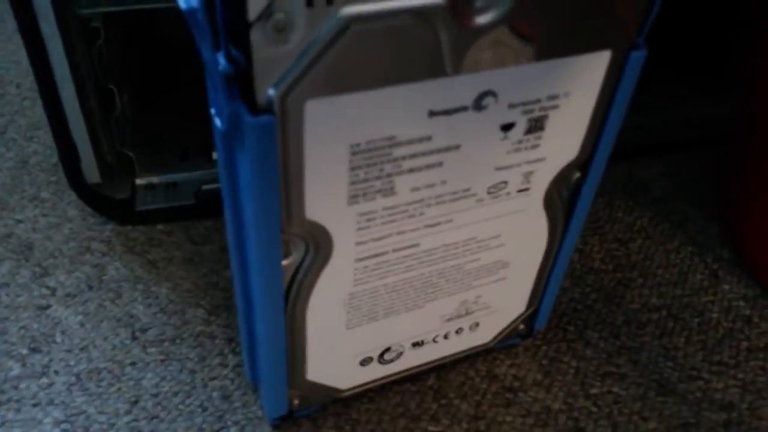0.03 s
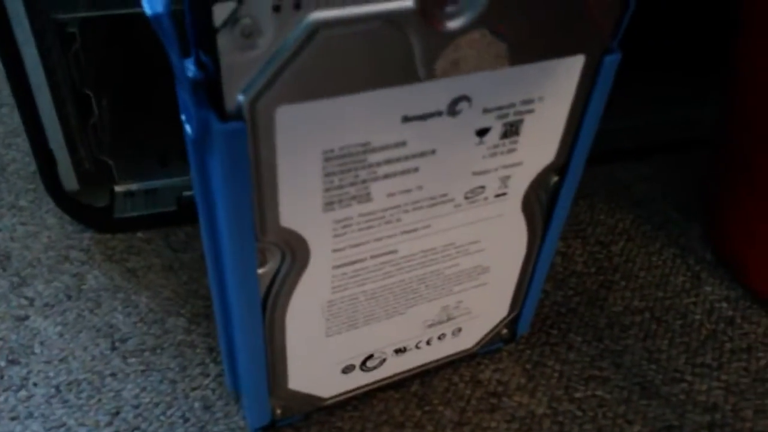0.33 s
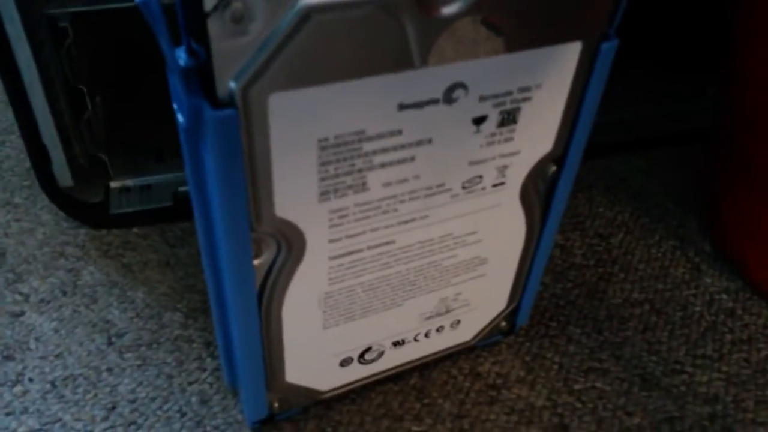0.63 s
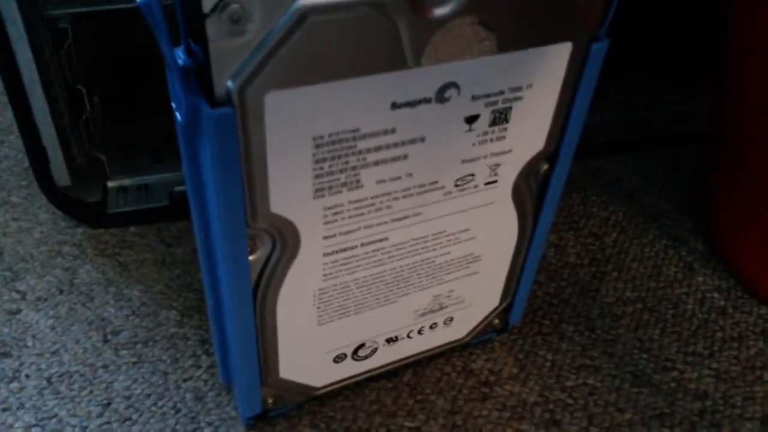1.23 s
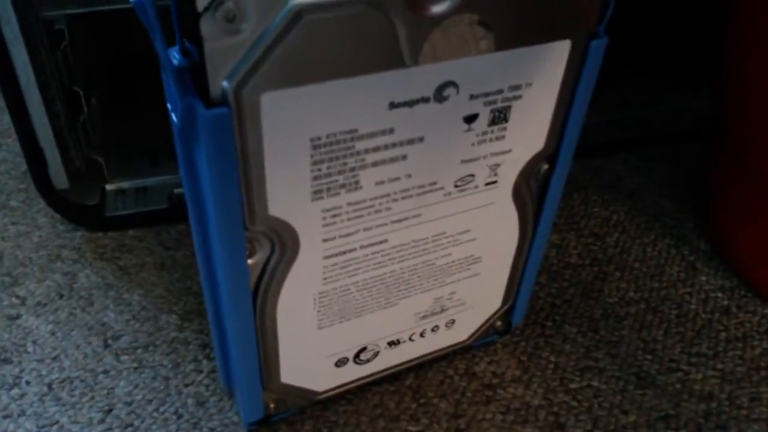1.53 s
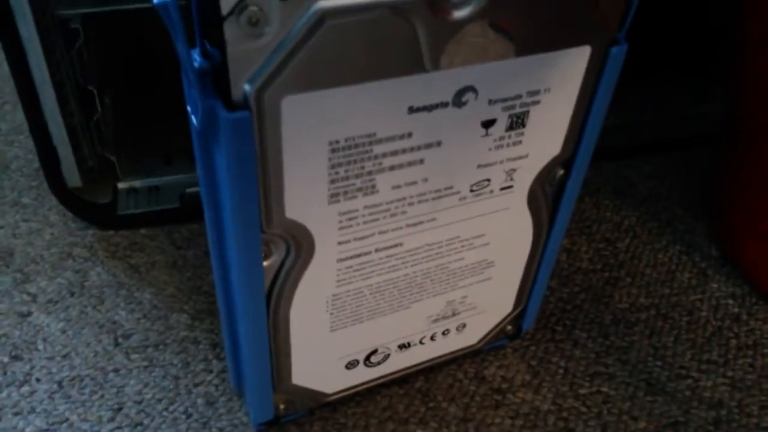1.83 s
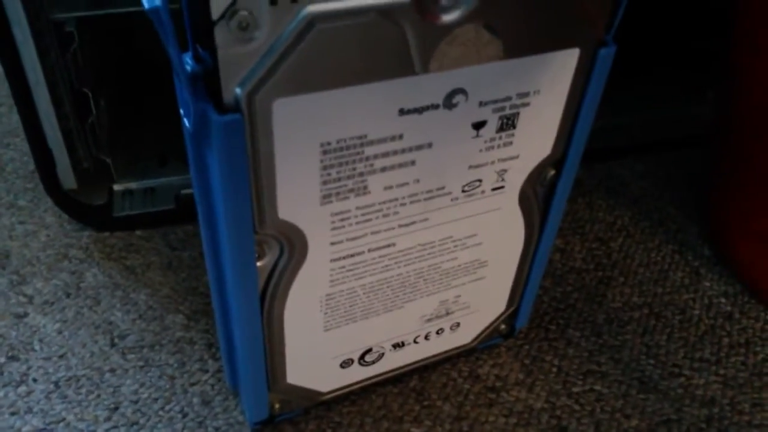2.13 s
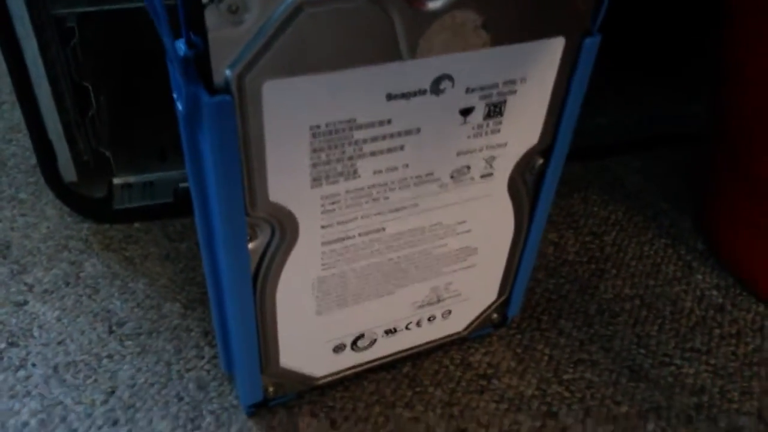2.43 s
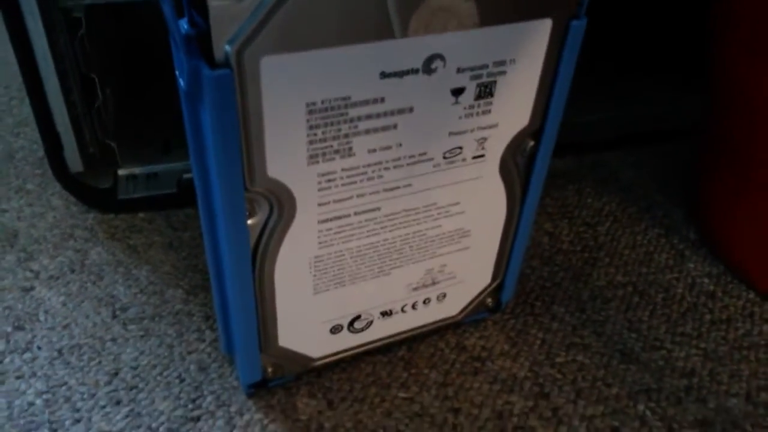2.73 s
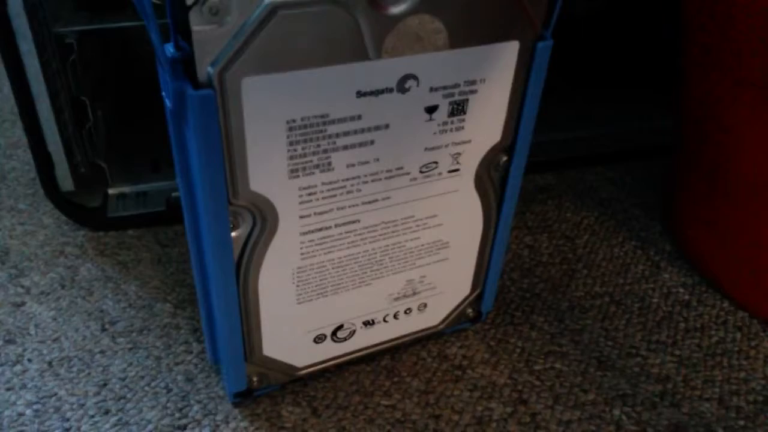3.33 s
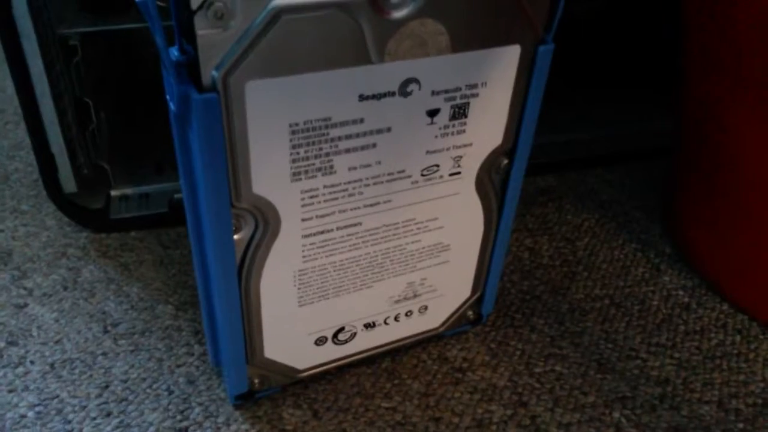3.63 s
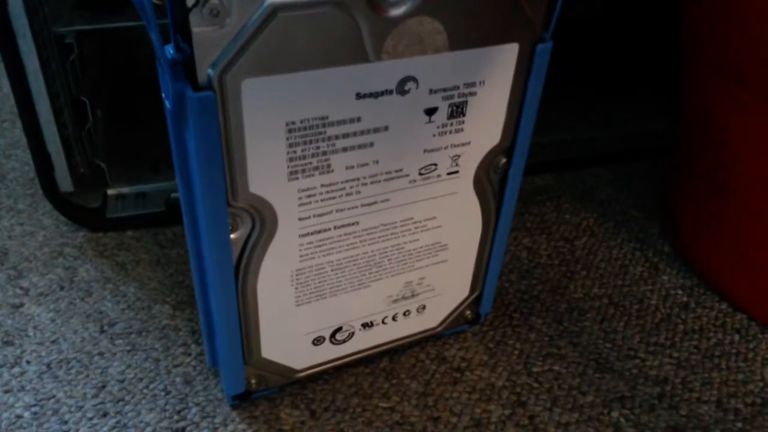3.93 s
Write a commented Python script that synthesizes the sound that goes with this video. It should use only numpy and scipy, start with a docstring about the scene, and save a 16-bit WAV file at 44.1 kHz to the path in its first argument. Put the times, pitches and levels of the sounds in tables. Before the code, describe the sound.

A hard drive spins up, its metallic hiss and whine rising in pitch.

```python
"""A bare hard drive spins up on a carpet, close by, in a quiet room with a low hum.
Two soft swishes come first. The spindle then rubs loosely, hissing through the ringing metal casing,
with a dull scrape, small knocks and, just after 1 s, brief squeaks. As speed builds, a rough whine enters
and the rub becomes a pattern that repeats every turn and climbs in pitch. Two more knocks come before 2 s;
near the end the whine sinks into the hiss."""
import sys
import numpy as np
from scipy import signal
from scipy.fft import rfft, irfft
from scipy.io import wavfile

SR = 44100
rng = np.random.default_rng(int(sys.argv[2]) if len(sys.argv) > 2 else 0)


def store_pcm(level_fs):
    """Save levels as 16-bit WAV."""
    pcm = np.round(np.clip(level_fs, -1, 1) * 32767).astype(np.int16)
    wavfile.write(sys.argv[1], SR, np.atleast_2d(pcm).T)


N = 176400
TOP_HZ = 14600


def spindle(turns, speed_rps):
    """Loose rub gives way to a per-turn pattern; both ring the casing, whose colour shifts with speed."""
    # Each row: time in seconds, level in dB.
    hiss_level = [(0, -77), (.35, -58.5), (.46, -48.5), (.68, -37), (1.2, -30.5), (1.7, -26.5), (2.2, -23),
                  (2.8, -22), (3.4, -22.5), (4, -22)]
    # Each row: resonance in Hz, width in Hz, left gain in dB, right gain in dB, low-speed change in dB.
    casing_modes = [(3068, 260, -24.5, -43, -11), (3592, 250, -17, -33, -12.5),
                    (3950, 160, -18.5, -27, -18.5), (4164, 109, 1, -12, -14), (4333, 106, 1.5, -13, -18),
                    (4666, 150, -3.5, -21, -15), (4850, 120, -2, -40, -22.5), (5044, 153, -4, -42, -14.5),
                    (5465, 165, -2.5, -25, -15.5), (5640, 220, -11, -21.5, -17),
                    (5832, 188, 0.5, -27.5, -13.5), (6224, 154, 4, -27, -21), (6430, 260, -18, -17, -11.0),
                    (6393, 240, -5.5, -40.0, -5.5), (6670, 137, -2, -9.5, -10),
                    (7026, 190, -1.5, -13.5, -4), (7186, 120, -9.5, -37.5, 3),
                    (7450, 183, -10.5, -18.5, -1.5), (7767, 223, -16, -28, -3.5),
                    (8040, 230, -7.5, -4.0, -20.5), (8310, 220, -6.5, -17.0, -11),
                    (8560, 130, -9.5, -32.5, -17), (8800, 450, -15.0, -15.5, -8.5),
                    (9180, 210, -15.0, -40, -7.5), (9520, 430, -14, -20.5, -19),
                    (10230, 630, -19, -18.0, -15), (10710, 440, -19.5, -43, -19.0),
                    (11370, 540, -19.5, -24.5, -8), (11970, 330, -18.5, -28.5, -10.5),
                    (12400, 490, -21, -22, -27)]
    # Floor under the resonances. Each row: frequency in Hz, gain in dB.
    casing_floor = [(300, -75), (1000, -136), (2000, -103), (3000, -80), (8000, -40), (12500, -30),
                    (13200, -37), (14500, -48)]
    # Broad rub at low speed. Each row: frequency in Hz, gain in dB.
    slow_rub = [(300, -72), (1500, -74), (2200, -69), (2900, -39), (3300, -61), (4200, -46), (5000, -33),
                (6500, -29), (9000, -40), (12000, -40), (14500, -51)]
    # Each row: frequency in Hz, phase lead of the left side in radians.
    left_lead = [(0, 0), (3190, 5), (3700, 1.6), (4050, -1.5), (5860, 1), (6720, -9), (8440, -5),
                 (8790, -5), (9130, -1.5), (9470, -4.5), (10800, -8.5), (11300, -8.5), (13300, -3.5),
                 (14000, -1.5)]
    # Each row: frequency in Hz, weight (0-1) of the right side's part unrelated to the left.
    stereo_spread = [(3000, 0.73), (4200, 0.66), (8000, 0.64), (12000, 0.8)]
    locked = 0.75 * ramp(speed_rps, 5.8, 30.5)  # share that repeats each turn
    left, unrelated = (np.sqrt(locked) * roughness(turns, speed_rps)
                       + np.sqrt(1 - locked) * rng.standard_normal(N) for _ in range(2))
    spread = across(stereo_spread)
    related = shaped(left, np.sqrt(1 - spread ** 2) * np.exp(-1j * across(left_lead)))
    drive = np.array([left, related + shaped(unrelated, spread)])
    hz, width_hz, left_db, right_db, change_db = np.array(casing_modes, float).T
    floor = undb(across(casing_floor))
    fast, slow = (np.array([np.hypot(resonances(zip(hz, width_hz, db + shift_db)), floor)
                            for db in (left_db, right_db)]) for shift_db in (0, change_db + 14))
    slow = np.hypot(slow, undb(across(slow_rub)))
    blend = ramp(speed_rps, 24, 40.1)
    hiss = blend * shaped(drive, unit(fast)) + (1 - blend) * shaped(drive, unit(slow))
    flutter_db = 0.5 * walk(rate_hz=160) - 0.1 * np.sin(2 * np.pi * turns)
    return hiss * undb(curve(hiss_level) + flutter_db)


def roughness(turns, speed_rps, size=16384, max_order=1500):
    """Roughness around the spindle, passed once a turn; its bands climb with speed."""
    # Each row: centre and width in multiples of the turn rate, boost in dB.
    strong_bands = [(64.5, 2, 10), (68.6, 2, 9), (77.9, 1.5, 8.5), (82.4, 3.5, 7.5), (87.7, 3, 4),
                    (92.6, 1.5, 8.5), (104.4, 2, 3), (111.6, 2, 7), (118.7, 7, 6.5), (126.5, 4, 7),
                    (140.95, 2, 8), (154.3, 4, 5.5), (177.3, 14, 3.5), (268, 30, 1.5)]
    order = np.arange(size // 2 + 1)
    boost_db = sum(db * np.exp(-(2 * (order - centre) / width) ** 2) for centre, width, db in strong_bands)
    phase = 2 * np.pi * rng.random(len(order))
    ripple = np.exp(1j * phase) * undb(boost_db + 2.1 * rng.standard_normal(len(order)))
    out, low = 0, 20
    while low < max_order:
        high = low + low // 3
        profile = irfft(ripple * ((order >= low) & (order < high)), size) * size
        fade = 1 - ramp(low * speed_rps, TOP_HZ, TOP_HZ + 1000)
        out = out + fade * np.interp(turns % 1 * size, np.arange(size), profile)
        low = high
    return out * np.sqrt(speed_rps / SR)


def whine(turns, speed_rps):
    """Rough partials, each a narrow noise band, climb and grow with speed, then sink into the hiss."""
    # Each row: multiple of the turn rate, relative level in dB at 40 turns/s, dB per doubling of speed.
    partials = [(57.3, -62, 20), (57.56, -58, 15), (59.6, -59, 4.5), (59.7, -64.5, 9), (81.7, -73, 20),
                (113, -71, 8), (114.8, -61.5, 6), (117.2, -57.5, 3), (120, -69, 3), (143, -69, 2),
                (161.5, -56, 8.5), (161.3, -61, 3)]
    # Each row: speed in turns per second, gain in dB.
    speed_fade = [(0, -2), (40, 0), (48, -0.5), (53, -8.5), (61, -17)]
    band_hz = 36
    doublings = np.log2(speed_rps / 40 + 1e-6)
    tone = 0
    for multiple, db, growth_db in partials:
        phase = 2 * np.pi * multiple * turns
        band = walk(band_hz) * np.sin(phase) + walk(band_hz) * np.cos(phase)
        tone = tone + undb(db + growth_db * doublings) * band
    fade_db = np.interp(speed_rps, *np.array(speed_fade, float).T)
    return tone * ramp(speed_rps, 9.6, 15) * undb(fade_db) * stereo_db(1.5, -1.5)


def knocks():
    """Small padded knocks: a hollow body note and a metallic tick, each with a short tail."""
    # Each row: start in seconds, relative body and tick levels in dB.
    hits = [(0.409, -47.5, -30.5), (0.609, -52, -30.5), (0.625, -42.5, -29), (1.726, -43, -27),
            (1.919, -39.5, -26)]
    # Each row of both: resonance in Hz, width in Hz, gain in dB.
    body_modes = [(410, 1200, -11), (1040, 350, -7), (1330, 180, 0), (1424, 70, 2), (2600, 620, -11.5)]
    tick_modes = [(4670, 370, -3), (5470, 1100, 6), (7060, 1600, -3)]
    rise_s, body_decay_s, tick_decay_s, tail_decay_s, tail_db = 0.0078, 0.011, 0.0057, 0.022, -24
    body = wide(resonances(body_modes), side=0.46)
    tick = wide(resonances(tick_modes), side=0.15) * stereo_db(4, -8)
    out = 0
    for start_s, body_db, tick_db in hits:
        age_s = np.maximum(times() - start_s, 0)
        rise = 1 - np.exp(-(age_s / rise_s) ** 2)
        tail = undb(tail_db) * np.exp(-age_s / tail_decay_s)
        for ring, db, decay_s in ((body, body_db, body_decay_s), (tick, tick_db, tick_decay_s)):
            out = out + 2 * ring * undb(db) * rise * (np.exp(-age_s / decay_s) + tail)
    return out


def squeaks():
    """As the motor picks up: a rising chirp, a tiny high squeak and a faint sagging tone, all unsteady."""
    # Each row: peak time in seconds, pitch there in Hz, glide in Hz/s, half length in seconds, relative dB.
    glides = [(1.19, 5860, 26000, 0.012, -27.5), (1.225, 13750, 12000, .012, -47),
              (1.255, 2280, -1100, 0.064, -57.5)]
    out = 0
    for peak_s, hz, hz_per_s, half_s, db in glides:
        age_s = times() - peak_s
        phase = 2 * np.pi * (hz * age_s + hz_per_s * age_s ** 2 / 2) + 0.5 * walk(rate_hz=60)
        out = out + np.sin(phase) * np.exp(-(age_s / half_s) ** 2) * undb(db)
    return out * stereo_db(4, -10)


def swishes():
    """Two soft, bright swishes before the spin-up, over a faint steady hiss."""
    # Each row: start, attack and length in seconds, relative level in dB.
    swells = [(0.077, 0.019, 0.072, -46), (0.21, 0.063, 0.094, -46)]
    # Each row: frequency in Hz, gain in dB.
    spectrum = [(1000, -39), (3000, -27), (4800, -3), (6200, -0.5), (7500, -7), (9000, -13.5),
                (14000, -20.5)]
    envelope = undb(-63.5)  # steady hiss
    for start_s, attack_s, length_s, db in swells:
        age_s = np.maximum(times() - start_s, 0)
        rise = 1 - np.exp(-(age_s / attack_s) ** 2)
        envelope = envelope + undb(db) * rise * np.exp(-(age_s / length_s) ** 2)
    return envelope * wide(undb(across(spectrum)), side=0.94) * stereo_db(1.5, -1.5)


def scrape():
    """Dull scraping while the spindle gathers speed; six bands flicker independently."""
    # Each row: frequency in Hz, gain in dB.
    spectrum = [(200, -13), (500, 4), (700, -0.5), (1000, -1.5), (1500, -8), (1900, -0.5), (2400, -9),
                (3000, -3.5), (3400, -9), (6000, -24)]
    # Each row: time in seconds, level in dB.
    level = [(0, -69), (.35, -61.5), (.7, -57), (1.05, -57), (1.3, -54), (1.6, -56), (2.0, -69.5),
             (2.5, -70), (3.2, -91), (4, -104)]
    flicker_db, spacing_oct = 3, 0.6
    colour, octave = undb(across(spectrum)), np.log2(bins() / 400)
    out = 0
    for k in range(6):
        band = colour * np.exp(-(octave - spacing_oct * k) ** 2 / 0.2)
        mid, side = (shaped(rng.standard_normal(N), band) for _ in range(2))
        out = out + (mid + 1.04 * np.array([side, -side])) * undb(flicker_db * walk(rate_hz=19))
    return unit(out) * undb(curve(level))


def room():
    """A wavering low hum, an uneven dull rustle and a faint steady rumble."""
    # Each row: resonance in Hz, width in Hz, gain in dB.
    hum_modes = [(80.6, 8.6, -2), (98.9, 10.5, 0.5), (121, 13, -7), (159, 60, -16), (187.3, 12.5, -10)]
    # Each row of both: time in seconds, level in dB.
    hum_level = [(0, -57.5), (.35, -54), (.75, -46), (1.1, -51.5), (1.35, -46.5), (1.8, -48.5), (2.1, -46),
                 (2.9, -46), (3.4, -45), (4, -47)]
    rustle_level = [(0, -74), (.35, -64), (.7, -58), (1.7, -53), (2.3, -57), (3, -60.5), (4, -66.5)]
    # Each row of both: frequency in Hz, gain in dB.
    rustle_spectrum = [(20, -17), (100, 8), (160, 5.5), (220, 5), (280, 3.5), (330, 2.5), (400, 2.5),
                       (520, -11.5), (700, -12), (1000, -62), (2000, -54), (14000, -31)]
    rumble_spectrum = [(15, -9), (30, 1), (48, 1), (62, -12), (200, -28), (1000, -66)]
    hum = wide(resonances(hum_modes), side=0.16) * undb(curve(hum_level))
    rustle = wide(undb(across(rustle_spectrum)), side=0.53)
    rustle *= undb(curve(rustle_level) + 2.5 * walk(rate_hz=12))
    rumble = wide(undb(across(rumble_spectrum)), side=0.55) * stereo_db(-71.5, -75.5)
    return hum + rustle + rumble


def undb(db):
    return 10 ** (np.asarray(db) / 20)


def stereo_db(left_db, right_db):
    return undb([[left_db], [right_db]])


def unit(x):
    return x / np.sqrt(np.mean(x ** 2))


def ramp(x, low, high):
    return np.clip((x - low) / (high - low), 0, 1)


def times():
    return np.arange(N) / SR


def bins():
    return np.arange(N // 2 + 1) * SR / N + 1e-3


def curve(rows):
    """Join (s, value) rows by straight lines."""
    return np.interp(times(), *np.array(rows, float).T)


def across(rows):
    """Join (Hz, value) rows on a log-frequency axis."""
    hz, value = np.array(rows, float).T
    return np.interp(np.log(bins()), np.log(hz), value)


def resonances(rows):
    """Gain by frequency of steep resonances, summed in power."""
    peaks = (undb(db) / (1 + (2 * (bins() - hz) / width_hz) ** 2) for hz, width_hz, db in rows)
    return np.sqrt(sum(peak ** 2 for peak in peaks))


def shaped(x, gain):
    return irfft(rfft(x) * gain, N)


def noise(gain):
    return unit(shaped(rng.standard_normal(N), gain))


def wide(gain, side):
    """Coloured mid/side stereo noise."""
    return noise(gain) + side * noise(gain) * np.array([[1], [-1]])


def walk(rate_hz):
    """Smooth random motion of rms 1."""
    return noise(1 / (1 + (bins() / rate_hz) ** 4))


def scene():
    """One speed curve drives hiss and whine; the other sounds run by the clock."""
    # Each row: time in seconds, spindle speed in turns per second.
    spin_up = [(.42, 0.49), (1.0, 6.5), (1.6, 14.2), (2.0, 21.6), (2.4, 29.6), (2.8, 37.4), (3.2, 45.7),
               (3.6, 53.6), (4.0, 58.6)]
    speed_rps = curve(spin_up)
    wander_turns = 0.0004 * walk(rate_hz=35)  # uneven rotation blurs the high partials
    turns = np.cumsum(speed_rps) / SR + wander_turns
    rotation = spindle(turns, speed_rps) + whine(turns, speed_rps)
    return rotation + scrape() + knocks() + swishes() + squeaks() + room()


def record(dry):
    """A steep low-pass cuts the top treble."""
    return signal.sosfilt(signal.ellip(10, 0.2, 80, TOP_HZ, fs=SR, output="sos"), dry)


dry = scene()
out = record(dry)
store_pcm(out)
```